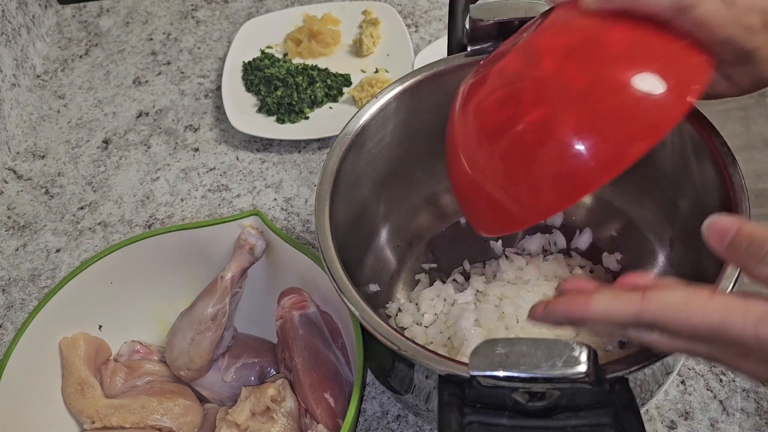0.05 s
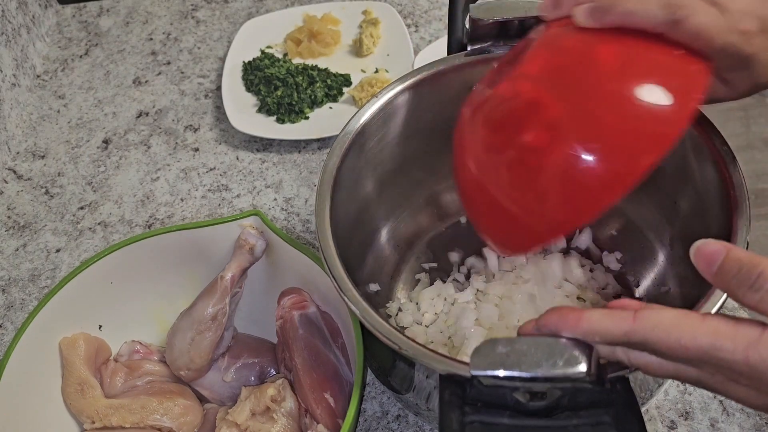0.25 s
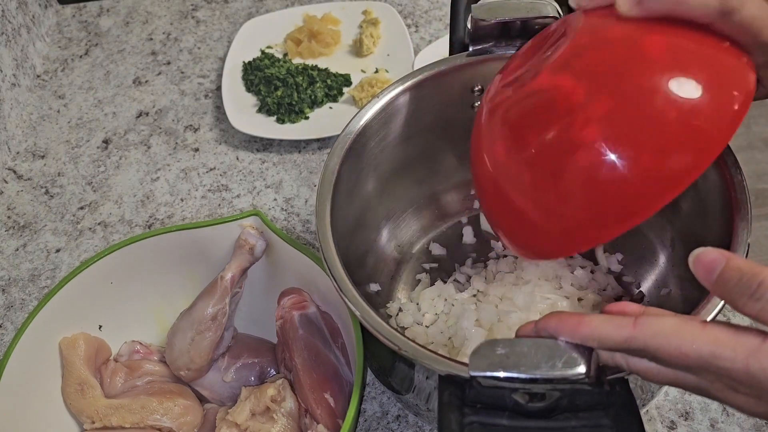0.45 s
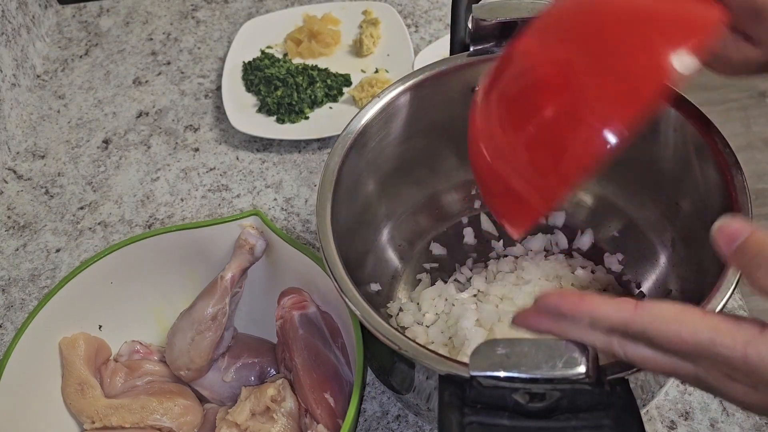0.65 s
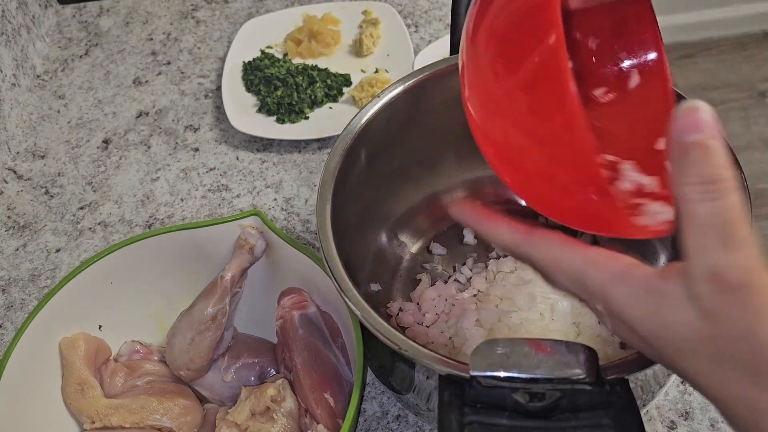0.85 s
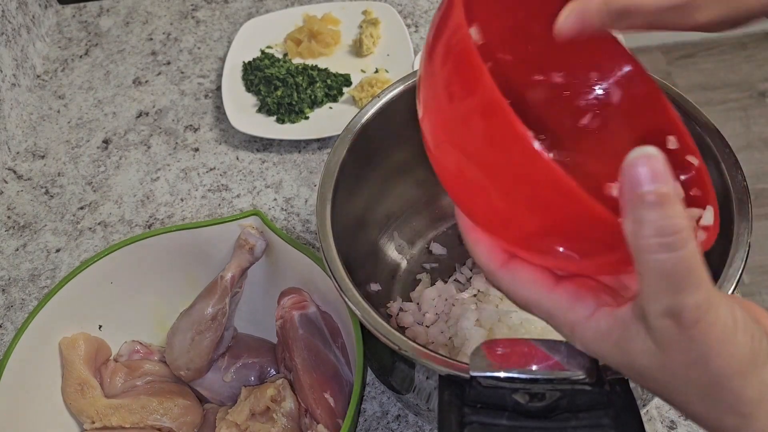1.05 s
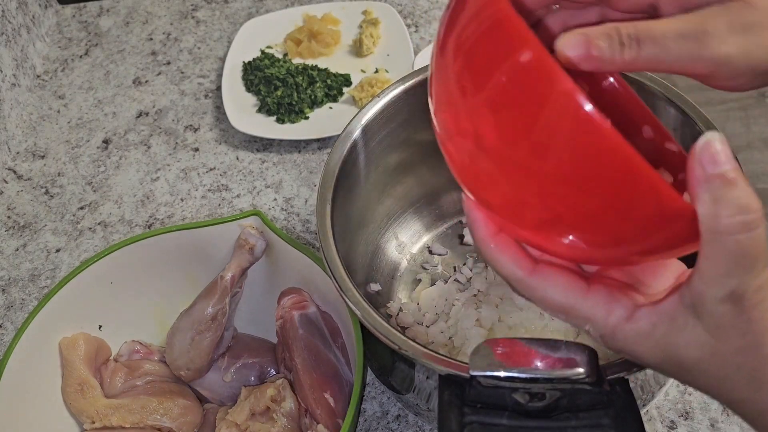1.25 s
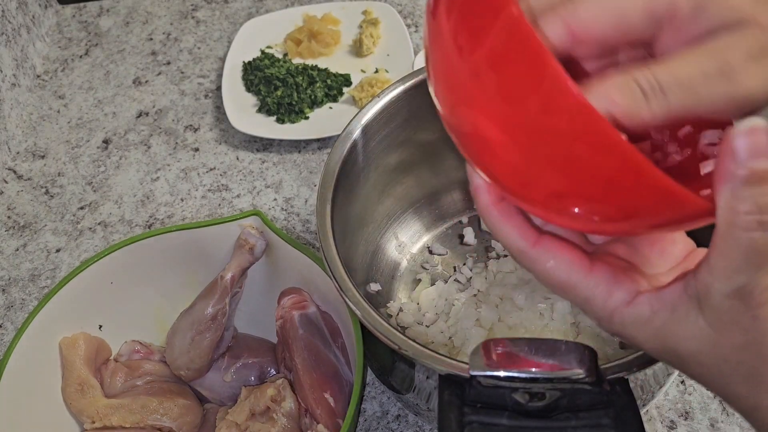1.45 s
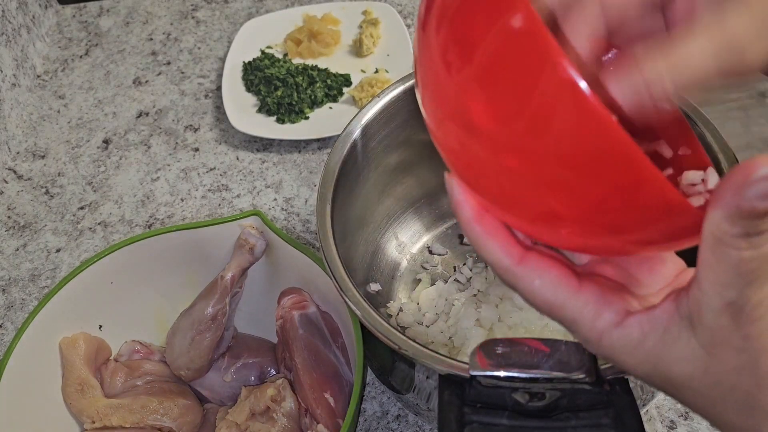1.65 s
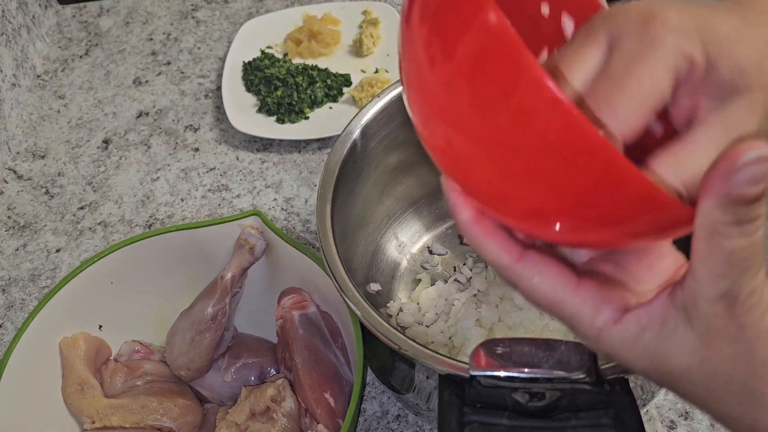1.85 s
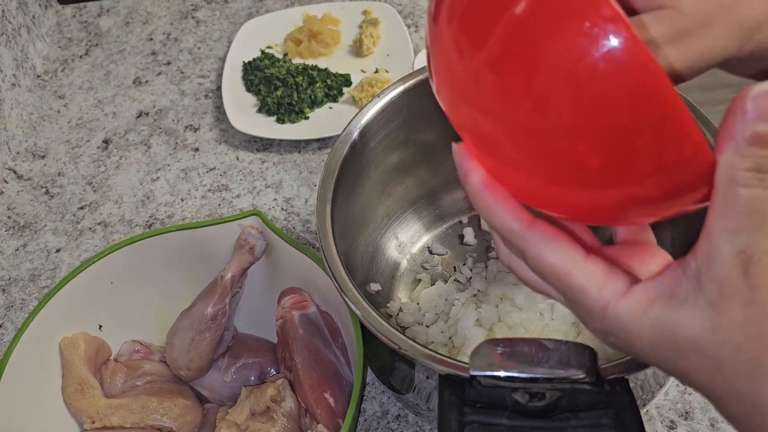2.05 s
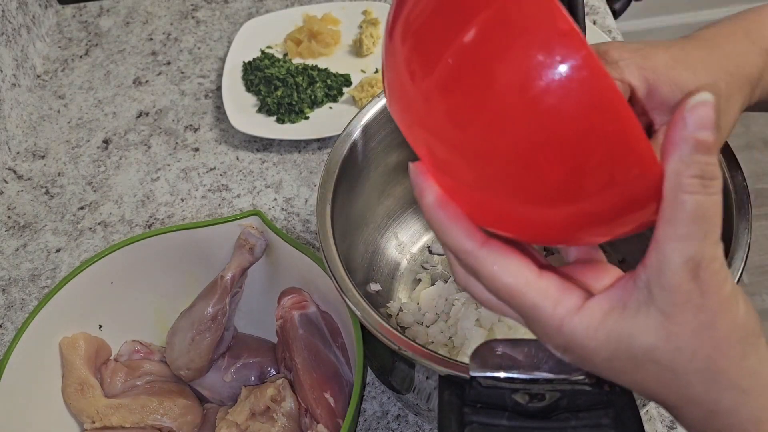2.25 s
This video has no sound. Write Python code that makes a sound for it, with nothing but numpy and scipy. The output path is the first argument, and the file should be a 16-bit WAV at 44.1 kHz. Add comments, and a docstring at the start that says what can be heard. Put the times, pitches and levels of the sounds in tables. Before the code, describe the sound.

Hard slaps on a plastic bowl held over a steel pot: one faint, then four loud in quick rhythm, with hollow thump and metallic ring. Then quiet finger taps, wet wiping and small ticks, close in a small kitchen.

```python
"""A hand knocks chopped onion from an upturned plastic bowl into a steel pot, in a small kitchen.
Throughout: filtered noise for quiet air and a wavering rumble. First, one faint slap and four hard ones:
noise-burst cracks, with decaying sines for the bowl, the pot, the room and a deep thud. Then the bowl is
cradled in a palm: light taps (noise and hollow modes), fingers wiping the wet wall (gated noise with random
slips) and wet pops (pitched noise ticks) as fingers or pieces come unstuck."""
import sys
import numpy as np
from scipy import signal
from scipy.fft import rfft, irfft, next_fast_len
from scipy.io import wavfile

SR = 44100
rng = np.random.default_rng(int(sys.argv[2]) if len(sys.argv) > 2 else 0)


def inscribe(sig):
    """Save sig as 16-bit PCM at rate SR to the path in sys.argv[1].

    A 1-D sig is mono; a 2-D sig holds one channel per row.
    Samples are clipped to [-1, 1] before scaling.
    """
    pcm = np.round(np.clip(np.atleast_2d(sig).T, -1, 1) * 32767)
    wavfile.write(sys.argv[1], SR, pcm.astype(np.int16))


N = 101429
T = np.arange(N) / SR

# Levels in the tables are relative unless stated.
# quiet air spectrum: f/Hz, density/dB
AIR_SPECTRUM = [(60, -23.5), (150, -1.5), (340, -7.5), (480, -6.5), (680, -7), (820, -6.5), (1050, -17.5),
                (2100, -15.5), (2600, -21.5), (3400, -17.5), (6400, -22), (10000, -23), (11500, -31),
                (16000, -30)]
# low rumble spectrum: f/Hz, density/dB
RUMBLE_SPECTRUM = [(20, -13.5), (34, -5), (46, -19.5), (59, 7.5), (80, -12.5), (118, -3.5), (150, -13),
                   (240, -14), (350, -35.5), (800, -57.5)]
# rumble level over time: t/s, level/dB
RUMBLE_LEVEL = [(0, -45), (.3, -49), (.8, -51.5), (1.08, -49.5), (1.2, -48), (1.45, -46.5), (1.7, -50),
                (1.82, -54), (1.92, -45.5), (2.06, -54.5), (2.3, -52.5)]
# slaps on the bowl: t/s, crack level/dB, bowl body level/dB, room boom level/dB, deep thud level/dB
SLAP_EVENTS = [(0.0433, -16, -11.5, -25, -39), (0.1399, 0, -0.5, -4, -13), (0.2972, 2, 2, -7, -5.5),
               (0.4463, .5, 2, -2, 5), (0.5823, 1.5, 3.5, 0.5, 4.5)]
# slap crack spectrum: f/Hz, density/dB
CRACK_SPECTRUM = [(100, -12), (300, 0.5), (600, 2.5), (790, -4.5), (920, 11), (1080, 0.5), (1450, 0.5),
                  (2000, -1), (2450, -4.5), (3000, 3), (4400, .5), (5800, -6), (7700, -3), (10000, -6),
                  (12000, -8.5), (15500, -11.5)]
# slapped bowl and the air under it, modes: f/Hz, level/dB, t60/s
BOWL_MODES = [(181.4, -3, 0.36), (201.6, 2, 0.39), (230, -2, 0.22), (259.4, 0, 0.1), (350, -6, 0.53),
              (400.6, 0.5, 0.33), (449.3, -8.5, 0.13), (528, -10.5, 0.4), (899, -3.5, 0.24),
              (946, -8.5, .12)]
# steel pot modes: f/Hz, level/dB, t60/s
POT_MODES = [(686.8, 2, 0.65), (719, 6, 0.61), (1706, 4.5, 0.12), (2856, -1.5, 0.42), (3073, 1, 0.13),
             (3520, -35, 0.19), (5940, -5.5, 0.34), (7760, 2, 0.11)]
# low kitchen modes: f/Hz, level/dB, t60/s
BOOM_MODES = [(100.5, 3, 0.56), (130.3, -2.5, 0.61)]
# deep thud of the slaps, modes: f/Hz, level/dB, t60/s
THUD_MODES = [(36, -13, 0.75), (63.35, 3, 0.5)]
# kitchen reverberation time: f/Hz, t60/s
KITCHEN_T60 = [(600, 0.37), (4000, 0.39), (8000, 0.35), (15000, 0.3)]
# light taps of fingers and onion pieces: t/s, click level/dB, hollow ring level/dB, soft knock level/dB
TAP_EVENTS = [(0.877, -38.5, -43, -29), (1.061, -35.5, -38, -28.5), (1.287, -31, -30, -20),
              (1.789, -20.5, -20, -19), (1.893, -25, -18.5, -26.5), (2.079, -24, -25.5, -20),
              (2.219, -27.5, -21.5, -26.5), (2.2489, -13.5, -21, -22)]
# tap click spectrum: f/Hz, density/dB
CLICK_SPECTRUM = [(200, 2), (550, 1), (950, 0), (1500, -7), (2500, -3.5), (3700, 7.5), (6000, -3.5),
                  (9500, -9), (15500, -10)]
# soft knock spectrum, also the noise in the slapped body: f/Hz, density/dB
KNOCK_SPECTRUM = [(40, -25.5), (110, 2), (260, -3), (500, -8.5), (1000, -27), (4000, -53)]
# hollow modes of the cradled bowl: f/Hz, level/dB, t60/s
CRADLED_MODES = [(368, -5, 0.11), (472, 5.5, 0.17), (683, 5, 0.24), (830, 15, 0.085), (870, -13, 0.053),
                 (932, 6, 0.095), (1310, 0.5, 0.024), (1470, -16, 0.031), (1920, -8, 0.017)]
# finger wipes on the wet wall: start t/s, rise/s, fall/s, hiss level/dB, treble spray level/dB, rub level/dB
WIPE_EVENTS = [(1.33, 0.12, 0.13, -58, -73, -63), (1.45, 0.14, 0.12, -55.5, -59, -56),
               (1.844, 0.066, 0.047, -48.5, -47.5, -55), (2.06, 0.032, 0.1, -58.5, -75, -63),
               (2.10, 0.098, 0.14, -55, -81, -52.5)]
# wipe hiss spectrum: f/Hz, density/dB
HISS_SPECTRUM = [(500, -26), (2500, 1.5), (3600, 2.5), (4700, -3), (6200, -11.5), (9000, -9),
                 (12000, -11.5), (15500, -17)]
# rubbed wall spectrum: f/Hz, density/dB
RUB_SPECTRUM = [(150, 9), (480, -11.5), (650, -8), (760, -1), (830, 9), (1050, -1), (1400, 2.5), (2000, -1),
                (2700, 6), (6000, -43.5)]
# fine treble spray spectrum: f/Hz, density/dB
SPRAY_SPECTRUM = [(2000, -20), (5000, -1.5), (8000, -6), (11500, -7.5), (15500, -5)]
# wet pops as a fingertip or a piece comes unstuck: t/s, centre f/Hz, level/dB
POP_EVENTS = [(1.540, 5850, -30.5), (1.57, 1300, -27.5), (1.714, 1310, -35), (1.857, 4140, -26),
              (1.866, 4370, -21.5), (1.885, 1340, -24), (2.2173, 1850, -24.5)]
# stereo balance: f/Hz, left minus right level/dB
LEFT_BALANCE = [(60, 1), (110, 2), (200, 3.0), (380, 1.5), (700, 5), (1290, 2), (2380, 3.5), (4400, 5.5),
                (8120, 5), (15000, 2)]

AIR_DB, AIR_LIKENESS, RUMBLE_SIDE_DB = -57.5, 0.15, -17  # likeness: correlation of left and right
TOUCH_LEAD_S, TOUCH_DB, TOUCH_T60_S = 0.00085, -18, 0.0088  # fingers touch just before the palm
SNAP_RISE_S, SNAP_T60_S = 0.00058, 0.011
WORKTOP_LAG_S, WORKTOP_DB = 0.0027, -9.5
PLASTIC_BUILD_S, PLASTIC_T60_S, PLASTIC_DB, CRACK_ROOM_DB = 0.00072, 0.11, 0.5, 0.5
CRACK_CHANGE = 0.96  # gain of the crack part new in each slap, against the repeated part
CRACK_DB, POT_DB = 3.5, -6
BODY_RISE_S, BODY_NOISE_DB, BODY_SIDE_DB, BODY_ROOM_T60_S = 0.001, -6, -8, 0.44
LOW_RISE_S = 0.048  # boom and thud
WIDE_HZ, WIDE_RAD_PER_EAR = 920, 0.71  # opposite phase shift at each ear; smaller below this pitch
EARLY_DB, EARLY_T60_S, TAIL_DB, ROOM_BUILD_S = -5, 0.038, -1, 0.0031
CLICK_T60_S, KNOCK_T60_S = 0.04, 0.094
SLIPS_PER_S, SLIP_SPREAD_DB, SLIP_DB, STUTTER_DB, STUTTER_PER_S = 350, 2, 1, 2.5, 110
POP_T60_S, POP_WIDTH_OCT, POP_SKIRT_DB = 0.014, 0.9, -21
TOP_HZ = 15900


def amp(db):
    """Decibels to gain."""
    return 10 ** (np.asarray(db) / 20)


def unit(x):
    """Scale each channel to unit energy."""
    return x / np.sqrt(np.sum(x ** 2, axis=-1, keepdims=True))


def fade(t60_s):
    """Exponential decay, 60 dB in t60_s."""
    return np.exp(-np.log(1000) * T / t60_s)


def build(time_s):
    """Exponential approach to full level."""
    return 1 - np.exp(-T / time_s)


def noise(*channels):
    """White noise, mono unless channels are given."""
    return rng.standard_normal((*channels, N))


def through(x, response):
    """Convolve with a response."""
    size = 2 * next_fast_len(N)
    return irfft(rfft(x, size) * rfft(response, size))[..., :N]


def log_hz(size):
    """Log frequency of the FFT bins, offset by 1 Hz to admit zero."""
    return np.log(np.fft.rfftfreq(size, 1 / SR) + 1)


def colour(x, points):
    """Minimum-phase filter through (f/Hz, level/dB) points; unit energy out."""
    size = next_fast_len(N // 2 + 1, True) * 2
    hz, db = np.array(points, float).T
    gain = amp(np.interp(log_hz(size), np.log(hz), db))
    # folding the cepstrum makes the filter causal
    cepstrum = irfft(np.log(gain))
    cepstrum[1:size // 2] *= 2
    cepstrum[size // 2 + 1:] = 0
    return unit(irfft(rfft(x, size) * np.exp(rfft(cepstrum)))[..., :N])


def strike(t0_s, db, response):
    """Place a response at a time and level."""
    start = int(np.clip(t0_s * SR, 0, N - 1))
    return amp(db) * np.roll(response, start, axis=-1) * (np.arange(N) >= start)


def ring(modes):
    """Sum of decaying stereo modes, each set by its energy; one second long, unit energy."""
    out = 0
    for k, (hz, db, t60_s) in enumerate(modes):
        sign = (-1) ** k
        phase = np.array([[1], [-1]]) * sign * WIDE_RAD_PER_EAR * min(hz / WIDE_HZ, 1)
        wave = np.sin(2 * np.pi * hz * T[:SR] + phase) * fade(t60_s)[:SR]
        out = out + sign * amp(db) * unit(wave)
    return unit(np.pad(out, ((0, 0), (0, N - SR))))


def background():
    """Quiet kitchen air over a low, wavering rumble: two stereo coloured noises."""
    apart = np.array([[1], [-1]])
    common = np.sqrt(1 + AIR_LIKENESS) * noise()
    side = np.sqrt(1 - AIR_LIKENESS) * apart * noise()
    air = amp(AIR_DB) * colour(common + side, AIR_SPECTRUM)
    rumble = colour(noise() + amp(RUMBLE_SIDE_DB) * apart * noise(), RUMBLE_SPECTRUM)
    rumble_gain = amp(np.interp(T, *np.array(RUMBLE_LEVEL).T))
    return np.sqrt(N) * (air + rumble_gain * rumble)  # unit energy to unit RMS


def kitchen():
    """Stereo noise responses: quick reflections from pot and worktop; a tail whose high treble dies first."""
    hz, t60s = np.array(KITCHEN_T60).T
    size = next_fast_len(N, True)
    white = rfft(rng.standard_normal((2, size)))
    tail = 0
    for weights, t60_s in zip(np.eye(len(hz)), t60s):
        band = np.interp(log_hz(size), np.log(hz), weights)
        tail = tail + irfft(white * band, size)[:, :N] * fade(t60_s)
    growth = build(ROOM_BUILD_S)
    early = noise(2) * fade(EARLY_T60_S) * growth
    return unit(early), unit(tail * growth)


def crack():
    """A sharp snap, its worktop reflection, the plastic's brief dense ring and the kitchen tail."""
    _, tail = kitchen()
    snap = unit(noise() * fade(SNAP_T60_S) * build(SNAP_RISE_S))
    reflection = strike(WORKTOP_LAG_S, WORKTOP_DB, unit(noise(2) * fade(SNAP_T60_S)))
    plastic = unit(noise(2) * fade(PLASTIC_T60_S) * build(PLASTIC_BUILD_S))
    return snap + reflection + amp(PLASTIC_DB) * plastic + amp(CRACK_ROOM_DB) * tail


def bowl_body(bowl):
    """Bowl modes with a short flesh knock and a longer, low stereo spread of noise."""
    flesh = colour(noise() * fade(KNOCK_T60_S), KNOCK_SPECTRUM)
    wide = noise() + amp(BODY_SIDE_DB) * noise(2)
    spread = colour(wide * fade(BODY_ROOM_T60_S), KNOCK_SPECTRUM)
    return bowl + amp(BODY_NOISE_DB) * flesh + spread


def slaps():
    """The palm lands on about the same spot: crack, bowl body, pot in sympathy, room boom, deep thud."""
    same_spot, out = crack(), 0
    bowl = unit(ring(BOWL_MODES) * build(BODY_RISE_S))
    pot = amp(POT_DB) * ring(POT_MODES)
    boom = unit(ring(BOOM_MODES) * build(LOW_RISE_S))
    thud = unit(ring(THUD_MODES) * build(LOW_RISE_S))
    for t0_s, crack_db, body_db, boom_db, thud_db in SLAP_EVENTS:
        touch = colour(noise() * fade(TOUCH_T60_S), CRACK_SPECTRUM)
        palm = colour(same_spot + CRACK_CHANGE * crack(), CRACK_SPECTRUM)
        out = out + strike(t0_s - TOUCH_LEAD_S, crack_db + TOUCH_DB, touch)
        out = out + strike(t0_s, crack_db, amp(CRACK_DB) * palm + pot)
        out = out + strike(t0_s, body_db, bowl_body(bowl))
        out = out + strike(t0_s, boom_db, boom)
        out = out + strike(t0_s, thud_db, thud)
    return out


def taps():
    """Small contacts on the cradled bowl: a noise click, a hollow modal ring and a soft noise knock."""
    hollow, out = ring(CRADLED_MODES), 0
    for t0_s, click_db, ring_db, knock_db in TAP_EVENTS:
        click = colour(noise() * fade(CLICK_T60_S), CLICK_SPECTRUM)
        knock = colour(noise() * fade(KNOCK_T60_S), KNOCK_SPECTRUM)
        out = out + strike(t0_s, click_db, click)
        out = out + strike(t0_s, ring_db, hollow)
        out = out + strike(t0_s, knock_db, knock)
    return out


def wipes():
    """Fingers slide unevenly over wet plastic: hiss full of tiny slips, brighter when fast, over wall rub."""
    slip_db = SLIP_SPREAD_DB * np.minimum(rng.exponential(size=N), 4)
    slips = (rng.random(N) < SLIPS_PER_S / SR) * np.sign(noise()) * amp(slip_db)
    stutter = amp(STUTTER_DB * np.interp(T * STUTTER_PER_S, np.arange(N), noise()))
    friction = (unit(noise()) + amp(SLIP_DB) * unit(slips)) * stutter
    hiss = colour(friction, HISS_SPECTRUM)
    rub = colour(friction, RUB_SPECTRUM)
    spray = colour(noise() * stutter, SPRAY_SPECTRUM)
    out = 0
    for t0_s, rise_s, fall_s, hiss_db, spray_db, rub_db in WIPE_EVENTS:
        ramp = np.interp(T, [t0_s, t0_s + rise_s, t0_s + rise_s + fall_s], [0, 1, 0])
        speed = np.sin(ramp * np.pi / 2) ** 2
        out = out + speed * (amp(hiss_db) * hiss + amp(rub_db) * rub)
        out = out + speed ** 2 * amp(spray_db) * spray
    return out * np.sqrt(N)  # unit energy to unit RMS


def pops():
    """Brief wet ticks: decaying noise, each centred on its own pitch."""
    out, step = 0, 2 ** POP_WIDTH_OCT
    for t0_s, hz, db in POP_EVENTS:
        band = [(hz / step, POP_SKIRT_DB), (hz, 0), (hz * step, POP_SKIRT_DB),
                (hz * step ** 2, 2 * POP_SKIRT_DB)]
        out = out + strike(t0_s, db, colour(noise() * fade(POP_T60_S), band))
    return out


def place(x, room):
    """Direct sound plus early reflections and tail."""
    early, tail = room
    return x + through(x, amp(EARLY_DB) * early + amp(TAIL_DB) * tail)


def lean_left(sound):
    """Split a frequency-dependent level difference between the ears, left louder."""
    hz, db = np.array(LEFT_BALANCE).T
    size = 2 * next_fast_len(N)
    left_db = np.interp(log_hz(size), np.log(hz), db)
    return irfft(rfft(sound, size) * amp(np.array([left_db, -left_db]) / 2))[:, :N]


def scene():
    """Slaps, then finger work with room reflections, over the background; all weighted to the left."""
    fingers = place(taps() + wipes() + pops(), kitchen())
    return lean_left(background() + slaps() + fingers)


def record(dry):
    """Steep elliptic low-pass: the extreme treble is cut."""
    low_pass = signal.ellip(10, 0.2, 80, TOP_HZ, fs=SR, output="sos")  # order, ripple dB, stopband dB
    return signal.sosfilt(low_pass, dry)


dry = scene()
out = record(dry)
inscribe(out)
```